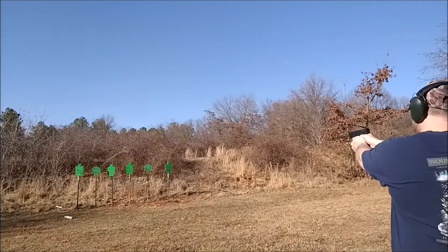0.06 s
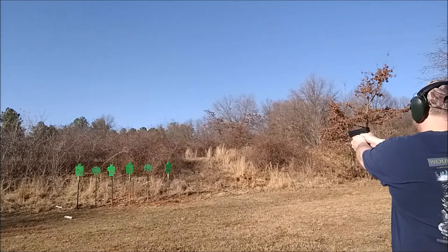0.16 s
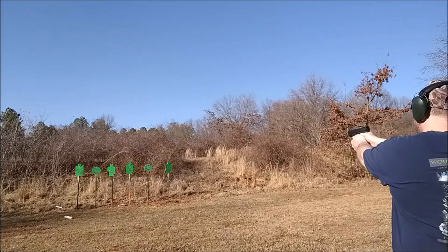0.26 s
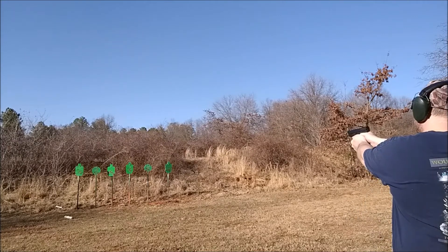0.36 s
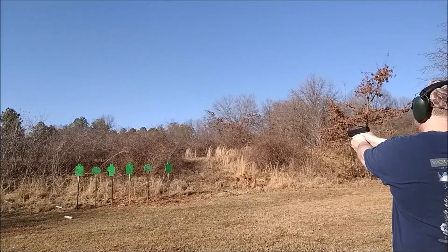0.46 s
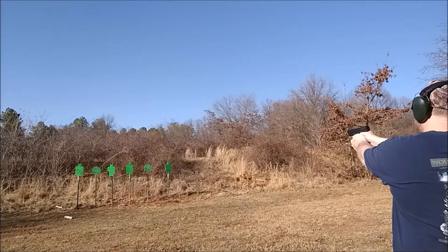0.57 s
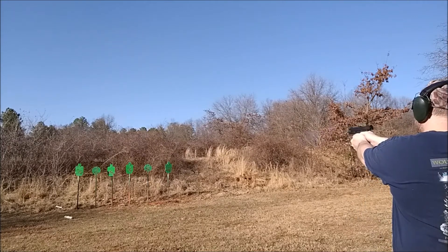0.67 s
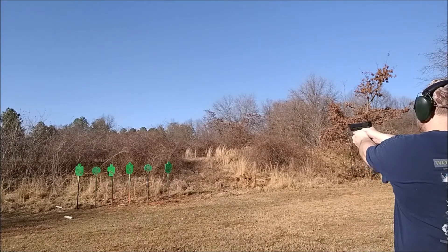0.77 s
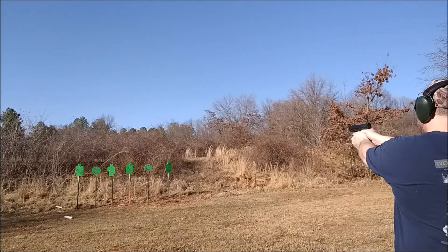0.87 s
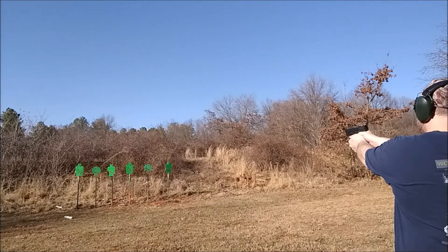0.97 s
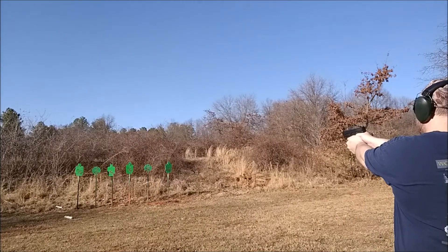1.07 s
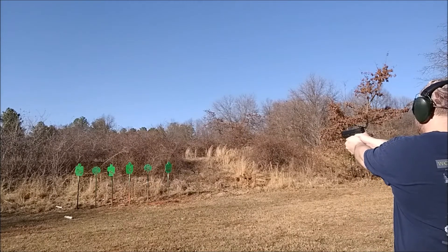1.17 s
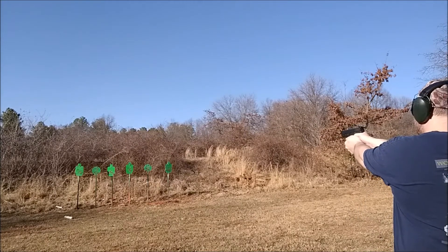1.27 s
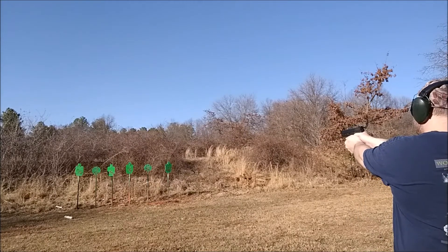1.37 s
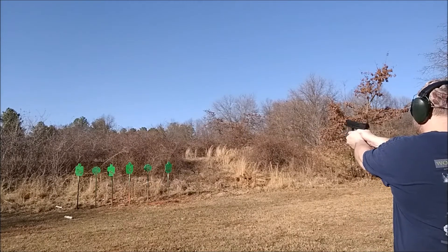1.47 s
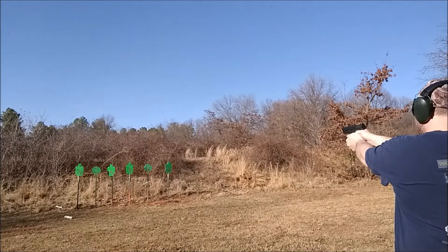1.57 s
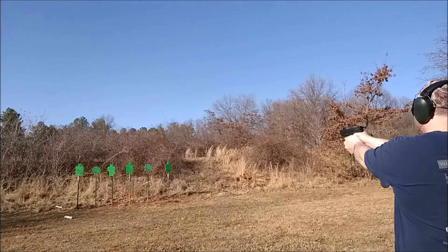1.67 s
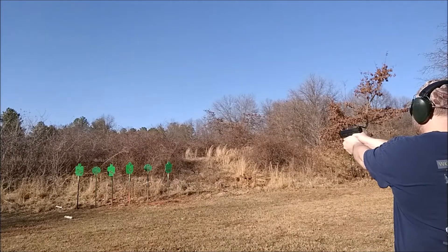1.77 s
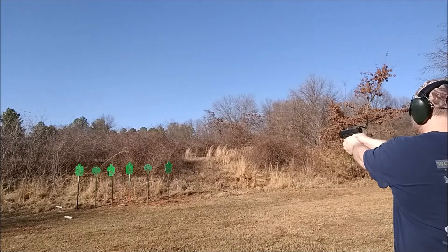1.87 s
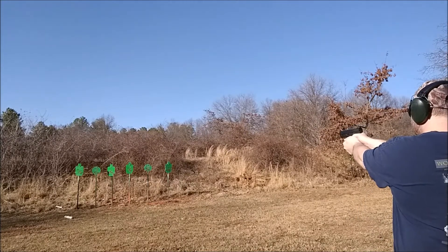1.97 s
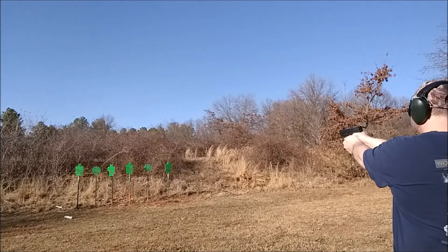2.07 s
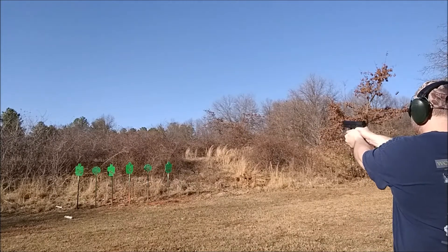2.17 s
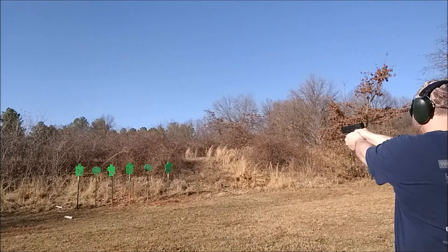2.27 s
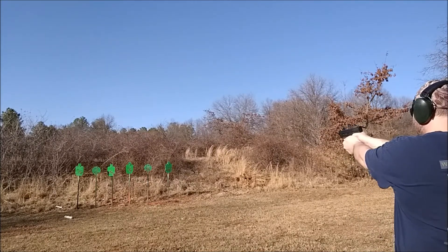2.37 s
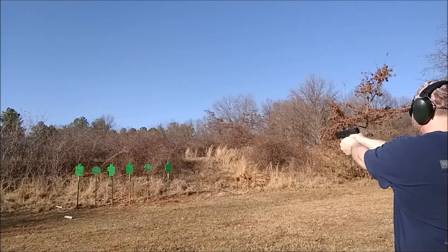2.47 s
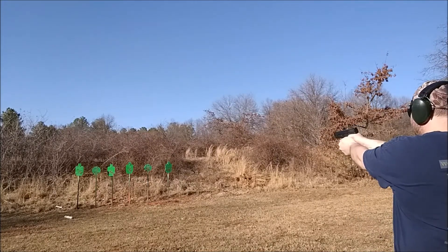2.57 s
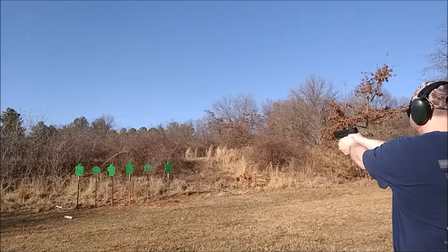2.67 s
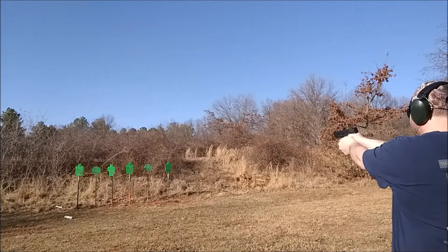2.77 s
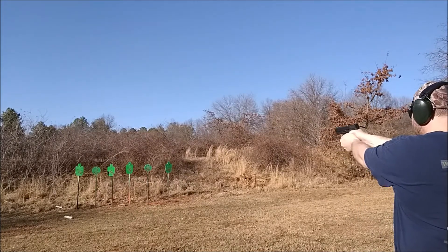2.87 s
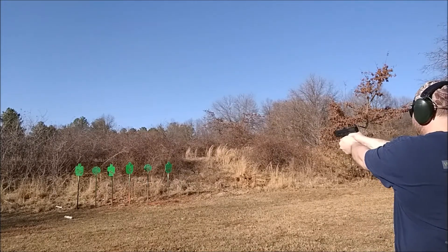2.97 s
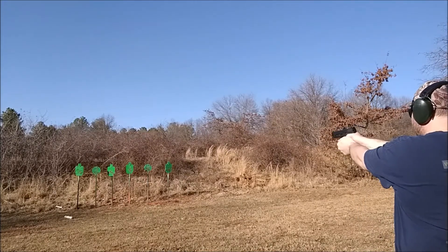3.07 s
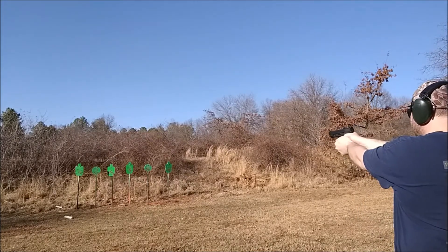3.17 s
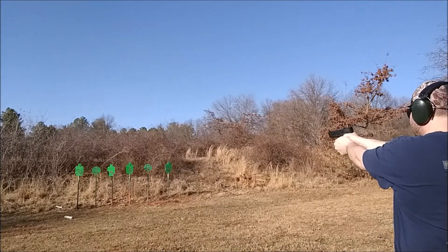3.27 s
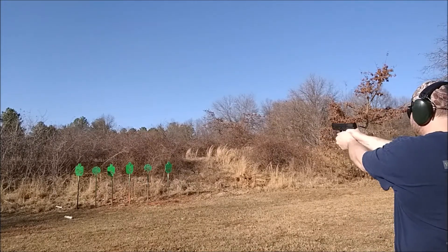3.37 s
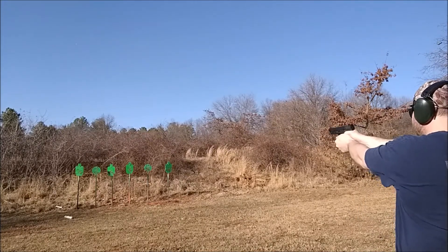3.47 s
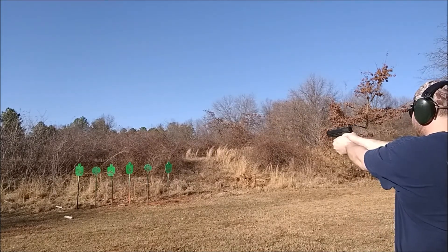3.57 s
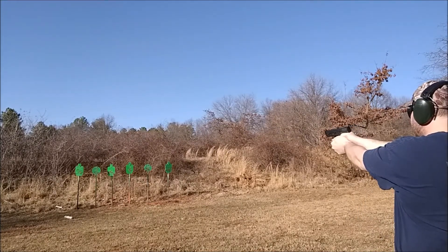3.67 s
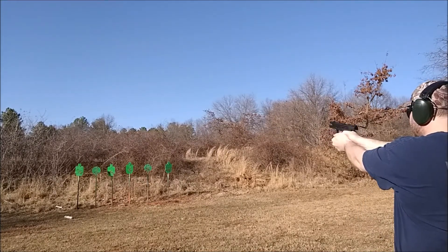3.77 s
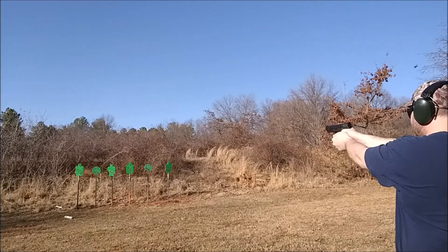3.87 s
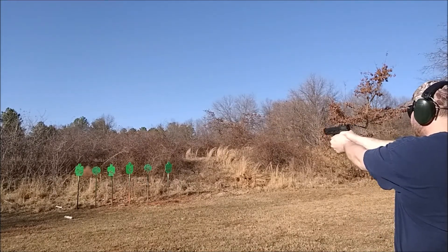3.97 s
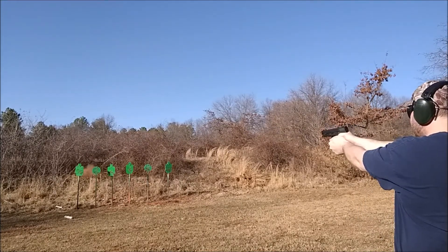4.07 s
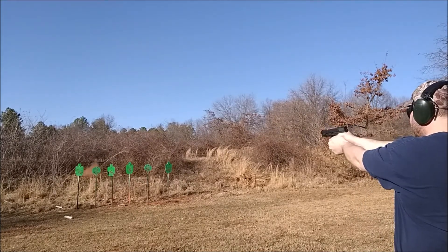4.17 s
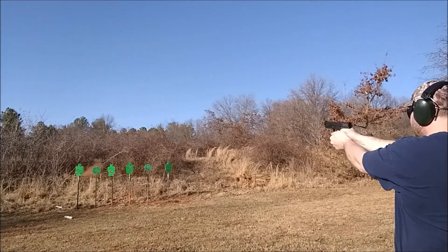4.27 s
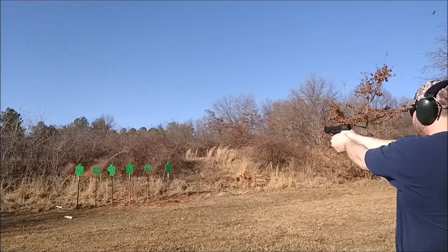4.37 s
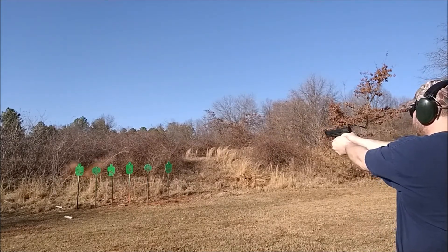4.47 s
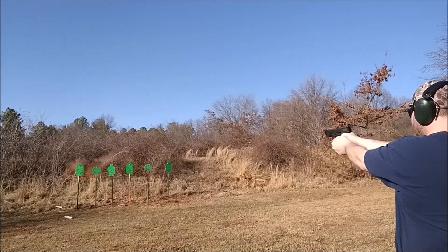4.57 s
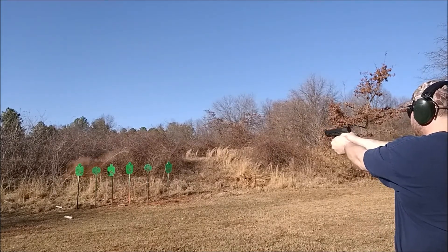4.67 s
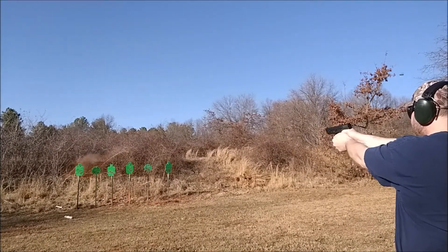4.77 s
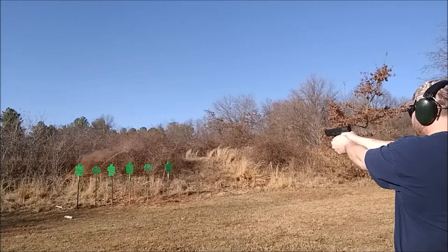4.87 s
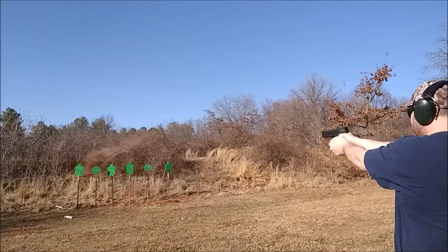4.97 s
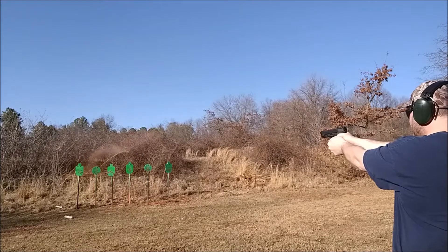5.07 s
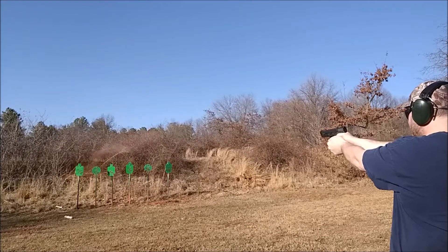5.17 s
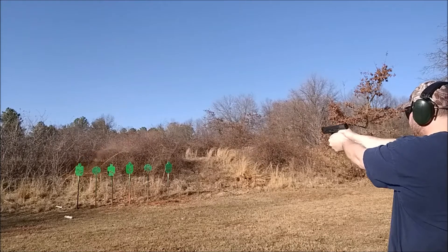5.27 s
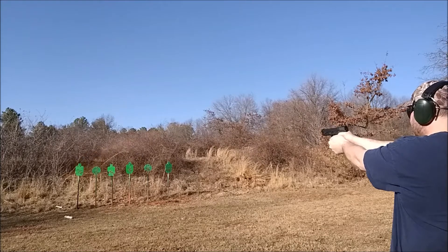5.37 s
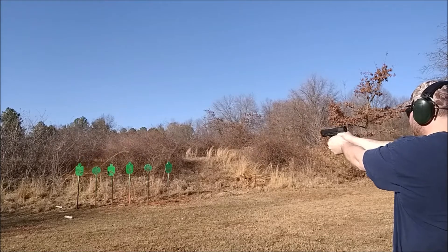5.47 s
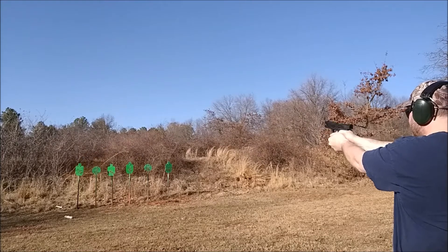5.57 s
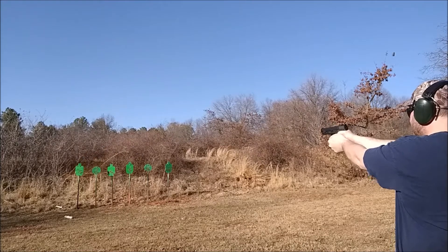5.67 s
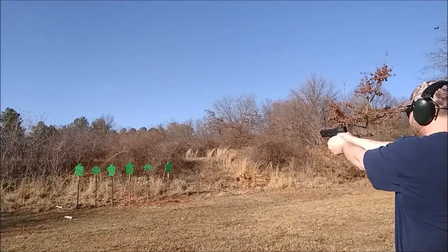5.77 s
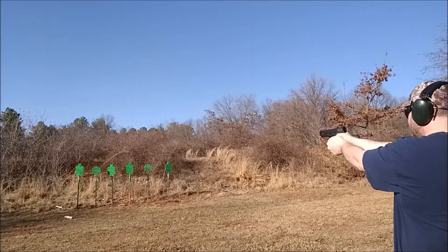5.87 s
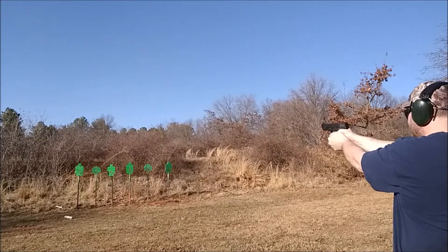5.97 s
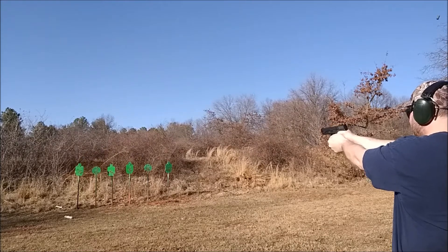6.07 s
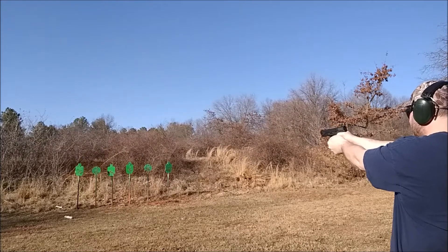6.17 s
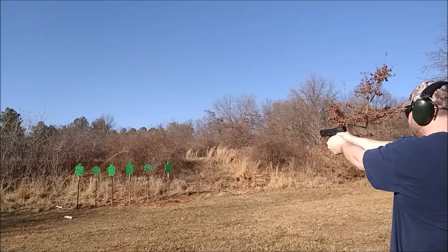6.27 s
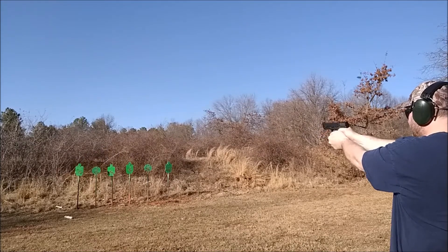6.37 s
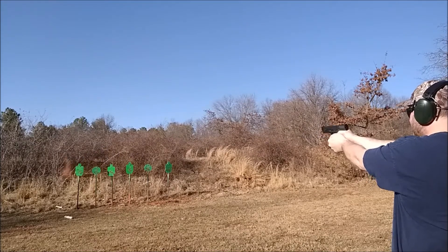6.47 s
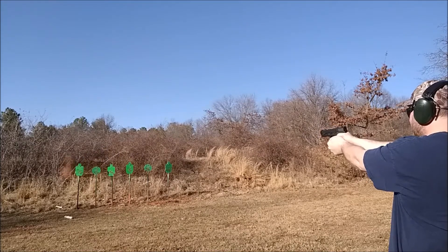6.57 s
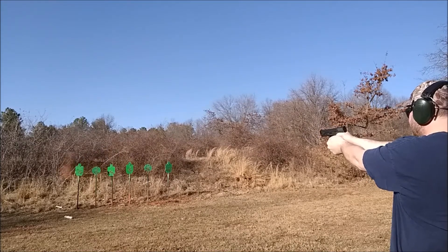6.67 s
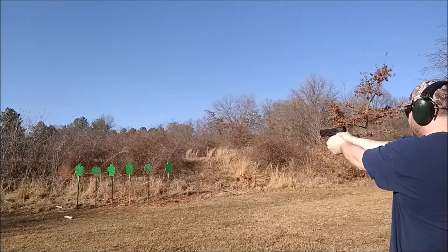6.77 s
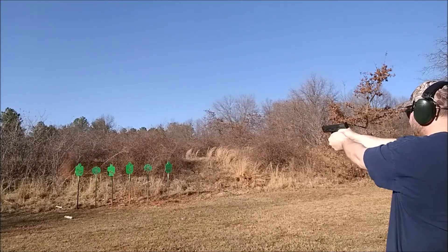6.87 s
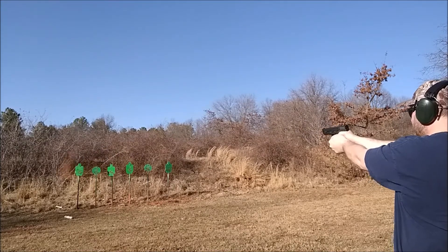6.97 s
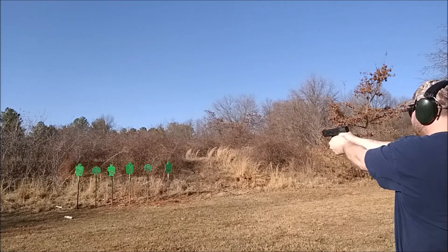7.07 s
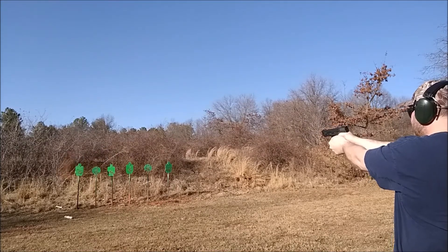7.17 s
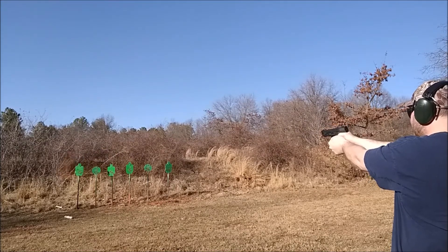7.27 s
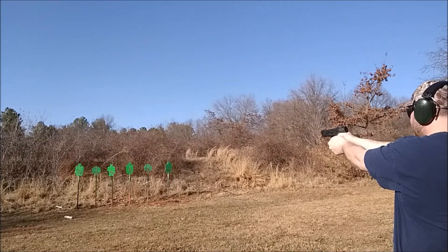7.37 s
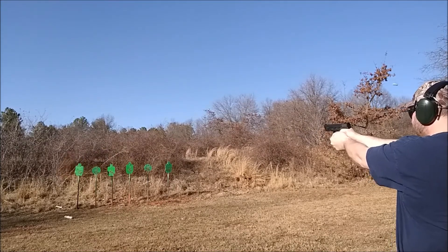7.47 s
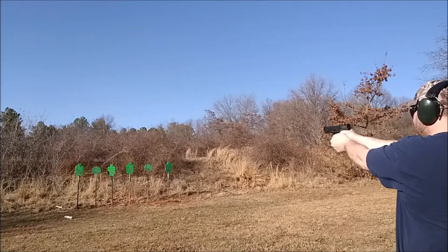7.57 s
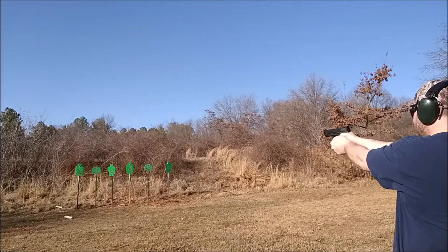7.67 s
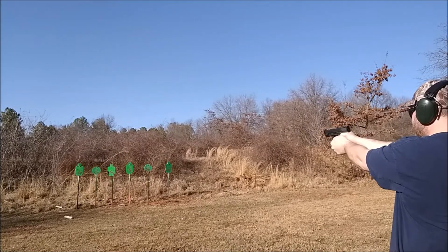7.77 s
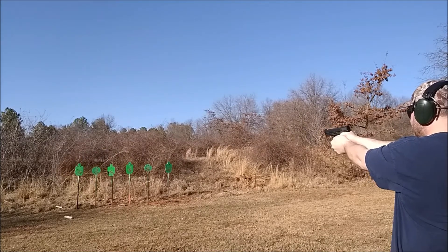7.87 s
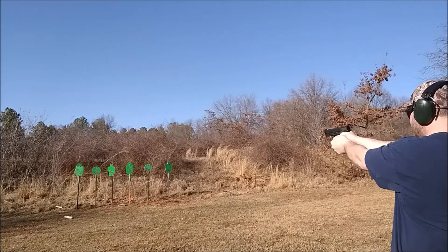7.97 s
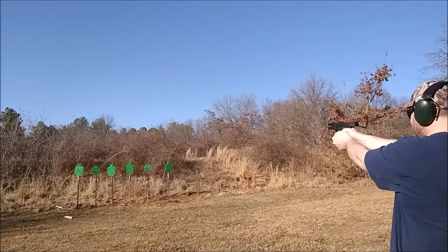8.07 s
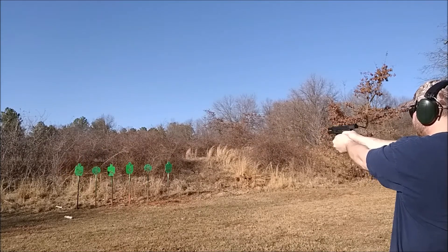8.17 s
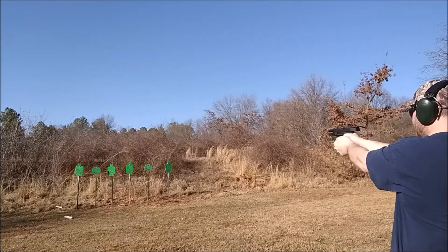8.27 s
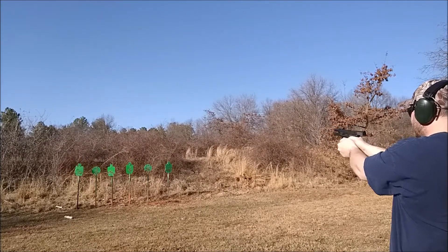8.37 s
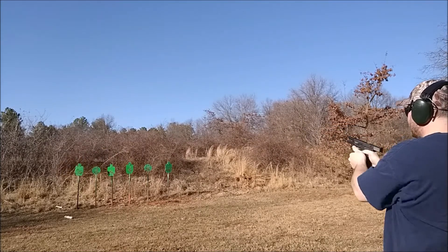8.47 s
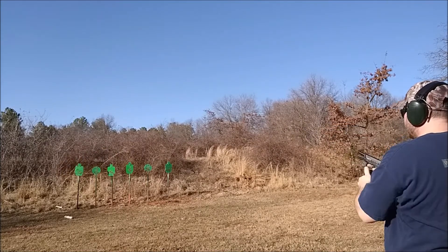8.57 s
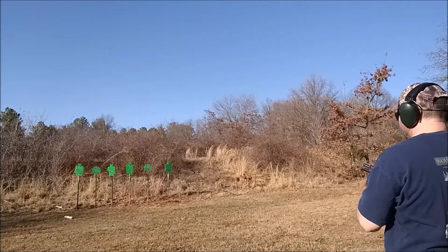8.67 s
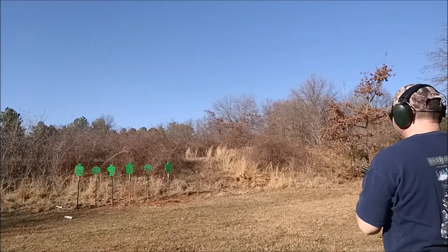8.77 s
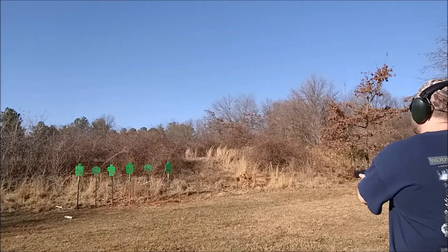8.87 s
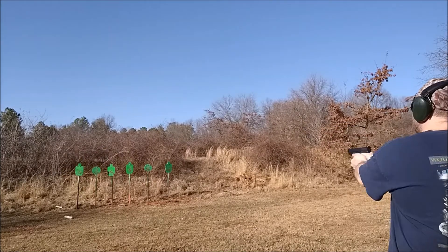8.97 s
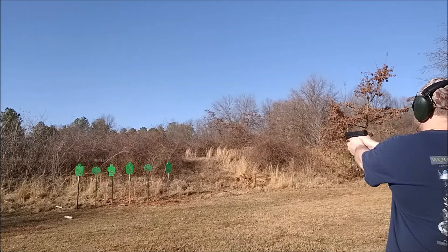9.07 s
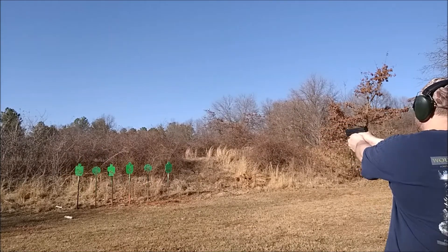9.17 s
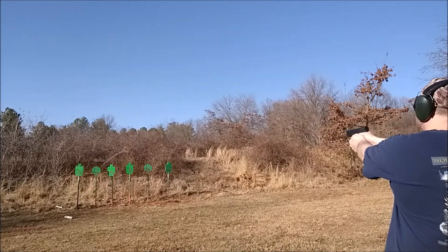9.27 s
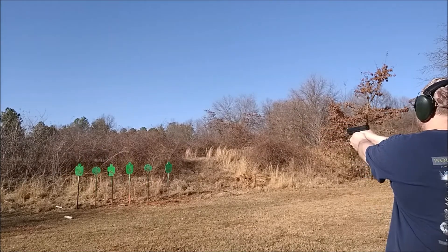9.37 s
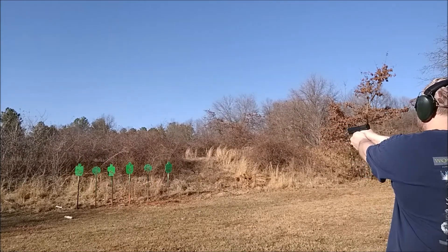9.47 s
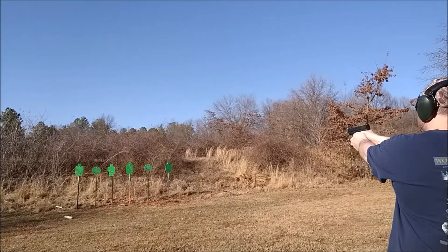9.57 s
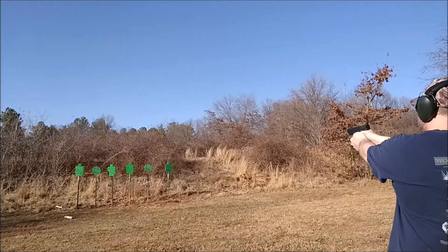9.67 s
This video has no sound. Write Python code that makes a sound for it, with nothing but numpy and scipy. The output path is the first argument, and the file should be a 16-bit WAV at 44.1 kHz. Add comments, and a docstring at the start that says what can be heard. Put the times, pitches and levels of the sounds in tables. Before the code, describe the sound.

Fifteen loud pistol shots crack across an open field, ten ringing steel plates about 50 milliseconds later, with rough echoes rolling off trees and light wind.

```python
"""Light wind and a faint air hiss come first; then a pistol fires fifteen times in a field edged by scrub.
Blasts are pressure pulses, hiss bursts and thumps; echoes from bank and trees are decaying bands of noise.
Hit steel plates ring on as decaying, beating sines; spent cases tick as short bright noise.
Wind is low noise with single puffs on the microphone ports. A stereo pocket recorder close by overloads
at each blast: its gain falls, jumps briefly twice, up or down, and recovers."""
import sys
import numpy as np
from scipy import signal
from scipy.fft import rfft, irfft
from scipy.io import wavfile

SR = 44100
rng = np.random.default_rng(int(sys.argv[2]) if len(sys.argv) > 2 else 0)


def inscribe(sig):
    """Save sig as 16-bit PCM at rate SR to the path in sys.argv[1].

    A 1-D sig is mono; a 2-D sig holds one channel per row.
    Samples are clipped to [-1, 1] before scaling.
    """
    pcm = np.round(np.clip(np.atleast_2d(sig).T, -1, 1) * 32767)
    wavfile.write(sys.argv[1], SR, pcm.astype(np.int16))


N = 429093
TIME = np.arange(N) / SR
# All source levels are ahead of the recorder's gain and saturation.

# steady air hiss, relative spectrum: (frequency [Hz], density [dB per Hz])
AIR = [(180, -23), (300, 3), (1550, -7.5), (1660, -6.5), (3140, -6.5), (3840, -8.5), (5190, -14),
       (15200, -2.5), (16500, -31)]
AIR_DB = -61
# wind strength: (time [s], level [dB])
WIND = [(0.0, -47.5), (0.46, -52), (1.35, -44.5), (2.0, -55.5), (2.6, -37.5), (3.0, -51), (3.28, -40),
        (3.5, -54), (3.98, -49.5), (4.79, -50.5), (5.07, -33), (5.94, -38), (6.07, -33), (7.07, -64.5),
        (7.34, -46), (7.45, -50.5), (8.67, -52.5), (9.73, -55.5)]
# single puffs on the ports: (time [s], level [dB], left minus right [dB])
BUFFETS = [(0.27, -42, -16), (0.59, -34, -12), (0.63, -35.5, -22), (8.768, -30, 16), (9.007, -39.5, 13),
           (9.055, -33.5, -16.5), (9.655, -42.5, -17)]

# pistol shots: (time [s], level [dB], first gain jump left [dB], right [dB],
#                second gain jump left [dB], right [dB], extra thump level [dB])
SHOTS = [(0.7226, -3.5, -13, 13, -25, 4.5, 4), (1.4886, -2, 5, -9, -6, 3.5, 2),
         (2.1943, 0, -4, -16, -8, 0, 1), (2.860, -2.5, 5.5, 3, 2, -3, -6),
         (3.3936, -2.5, -4, 7, -2.5, -3, 1), (3.8173, -2, 3, -10, 1, -1, 2),
         (4.2788, -2.5, 0, -15, 3, 0.5, 3), (4.7534, -2.5, 7.5, -16.5, 4.5, 3, -2.5),
         (5.2577, -1.5, 2, 8.5, 2.5, 1.5, -9), (5.5959, -1.5, -2, -18.5, -2, 2, 1),
         (5.9766, -2.5, 1, 3.5, 0, 4.5, -8), (6.374, -1.5, 0, -47, -29, -5, 3),
         (6.8606, -2.5, -6, -15, -9, -3, 2), (7.4623, -1.5, 1, 5.5, -12, 2.5, -2),
         (8.075, -2, -34, -6.5, -28, 1, 10.5)]
# blast and its distinct echoes, hiss ahead of its filters: (time after the shot [s], pulse level [dB],
#  pulse width [s], hiss level [dB], hiss t60 [s], hiss top [Hz])
ARRIVALS = [(.0015, 5, 0.00063, 14.5, 0.0099, 14000), (.0046, 9.5, 0.00015, 8, 0.0087, 14000),
            (.0165, 2, 0.00048, 8.5, 0.064, 12000), (.0487, 5, 0.00015, 0.5, 0.013, 12000),
            (.073, -3, .0002, -13.5, .03, 4000), (.2135, -18, 0.0002, -11, 0.032, 3000)]
# slow pressure swings of the blast: (time after the shot [s], level [dB], width [s])
THUMP = [(.001, 0.5, 0.0093), (0.017, -7, 0.0044)]
BLAST_VARIES_DB = 2.5   # random spread, drawn separately for each port

# echo tail, relative spectrum: (frequency [Hz], density [dB per Hz])
ECHO_COLOUR = [(71, -46), (120, -19), (316, -18), (529, -8.5), (677, -7.5), (751, -6), (1200, -3),
               (1610, -8), (5420, -5), (8530, -1), (10300, -51), (15200, -42), (16500, -53)]
# echo decay: (frequency [Hz], t60 [s])
ECHO_T60 = [(150, 0.8), (400, 0.95), (800, 1.74), (1300, 1.333), (2500, 0.95), (5000, 0.59), (9000, 0.35),
            (11000, 0.1), (14000, .25)]
# dips and swells of the scattered sound: (time after the shot [s], level [dB])
ECHO_SWELL = [(0, 7), (.03, -2), (.05, 6.5), (.12, -2)]
# clumps of reflectors, depth per unit of lumpiness: (frequency [Hz], depth [dB])
ECHO_LUMPS = [(200, 3.5), (900, 3), (2500, 1.5), (6000, 0.5)]
# second tail from the far woods: (frequency [Hz], level relative to the first tail [dB])
FAR_WOODS = [(300, -29), (700, -35), (1500, -88), (2600, -4), (4000, -40)]
FAR_WOODS_T60_S = 1.73
ECHO_DB, ECHO_STOPS_S = -6, 8.912
LAG, BASS_LAG = 15, 7   # right port delay [samples]; low scatter comes more from the front

# plate modes, in families that one hit point excites alike: (frequency [Hz], level [dB], t60 [s])
LARGE_MODES = [
    [(3130, 0, .9), (7525, -8, .35), (7920, -5, .4)],
    [(4745, 0, .5)],
    [(6095, 0, .45)],
    [(1405, 0, .25)],
    [(6165, -9, .3), (6918, -3, .33), (8110, -6, .3)],
    [(8690, 0, .3), (9410, -5, .25), (10150, -7, .22), (10720, -7, .22), (11820, -6, .22), (12520, -4, .23),
     (13370, -8, .17), (14050, -8, .17), (14900, -10, .14)],
]
SMALL_MODES = [
    [(6060, -6, .5), (6602, -1, .45), (8190, -8, .4), (8940, -5, .3)],
    [(12250, 0, .3), (11750, -3, .2), (13210, -3, .2), (13680, -2, .2), (13960, 0, .25), (14480, -2, .2)],
]
# strongest single tones of the plates: (frequency [Hz], t60 [s], right port delay [ms])
LARGE_TONES = [(2298, .78, .31), (3766, .64, .21), (3990, .55, .09), (4517, .58, .14), (11073, .4, .183)]
SMALL_TONES = [(1585, .27, .15), (3574, .58, .09), (3830, .6, .28), (10115, .45, .13)]
# hits: (time [s], detuning [parts per thousand], base split of the mode clusters [Hz], t60 factor [ratio],
#        left minus right of the single tones [dB], [level of each family [dB]],
#        [per single tone: (level [dB], partners), () if silent])
# partner: (offset from the tone [Hz], share of its strength [ratio], time after the hit when it opposes it [s])
LARGE_HITS = [ (0.78, 1.3, 7, 1.36, 2.5, [-31.5, -34.5, -33.5, -34.5, -25, -27], [(-14, (-6, 1, 0.062),
              (4.5, 0.82, 0.068)), (-13, (-7.5, 0.53, 0.013)), (-16.5, (-7.5, .4, 0.009)),
              (-17.5, (-3.3, 0.2, 0.084)), (-17.5, (-8, 0.91, 0.029))]),
              (2.915, -0.61, 15, 1, -1.5, [-35, -55, -42, -33, -18, -28], [(-6, (-12.5, 0.53, 0.026),
              (4.06, 0.52, 0.077)), (-30.5, (-4, 0, .12)), (-19.5, (-7, 1, -5)), (), (-50,)]),
              (3.449, 1.8, 11.7, 1.29, -4, [-35.5, -34, -57, -15.5, -14, -27.5], [(-13, (-11, 0.57, 0.036),
              (6.3, 0.47, 0.16)), (-36,), (), (-29, (-2, 0.9, 0.18)), (-62,)]),
              (5.651, -2.9, 9.5, 1, -3, [-35, -39, -63, -21, -12.5, -28], [(-12.5, (-5.5, 0.68, 0.068),
              (10.7, 0.19, 0.015)), (), (), (-21.5,), (-40,)]),
              (6.914, -2, 10, 1.02, -4, [-52, -40, -28, -15, -14, -34], [(-9, (-2, 0.87, -0.066),
              (3.64, 0.7, 0.04)), (-34,), (-17.5, (-3.5, 0.62, 0.016)), (), (-54, (-10, 0.17, .04))]),
              (7.517, -1.55, 7.1, 1.12, 2, [-35.5, -38, -27, -41, -51, -21.5], [(-31, (-8, 0.22, 0.18)),
              (-23, (-5.5, 0.86, 0.28)), (), (-19.5, (-3, 1, 0.026)), (-39, (-10.5, 0.85, 0.11))])]
SMALL_HITS = [(1.544, 0.19, 30, 0.86, -2.4, [-22.5, -36], [(-25,), (-23,), (), (-31, (-8, 0.5, .02))]),
              (2.247, 0.1, 16, 0.85, -1.5, [-21.5, -36], [(-13, (-8, .6, .06)), (-15, (-6, 0.41, 0.095)),
              (), (-31, (-7, .4, .02))]), (4.804, -0.1, 13, 0.94, -1.5, [-21, -38], [(-9, (-8, .6, .06)),
              (-14.5, (-2.5, 0.86, 0.033)), (), (-15, (-3, 1, 0.016))]),
              (8.13, 0.61, 14, 0.84, -1.5, [-24, -35], [(-19,), (), (-21.5, (-2, 0.67, .0)),
              (-31, (-4, .4, .02))])]
TONE_RISE_S = 0.0024   # time constant of the single tones' rise
# spent cases landing, noise ahead of its band-pass: (time [s], level [dB])
CASINGS = [(1.26, -74.5), (1.984, -62.5), (3.3662, -45), (7.382, -44), (8.5794, -47), (8.8852, -44)]

# recorder sensitivity: (time after the shot [s], gain [dB])
RECOVERY = [(0, -24), (.05, -13.5), (.15, -2), (.26, -1.5)]
# two brief gain jumps after each blast: (start after the shot [s], end after the shot [s], edge [s])
GAIN_JUMPS = [(.0055, .013, 0.00056), (.021, .041, 0.0038)]
CUTOFF_HZ = 17100


def from_db(db):
    """Decibels to amplitude gain."""
    return 10 ** (np.asarray(db) / 20)


def rms_one(x):
    """Scale to rms 1."""
    return x / np.sqrt(np.mean(x ** 2) + 1e-20)


def at_hz(points, hz):
    """Read a table on a log-frequency axis."""
    table = np.array(points)
    return np.interp(np.log(hz), np.log(table[:, 0]), table[:, 1])


def over_time(points, seconds):
    """Read a (time, value) table along straight lines."""
    return np.interp(seconds, *np.transpose(points))


def band(x, low_hz, high_hz):
    """Band-pass."""
    return signal.sosfilt(signal.butter(2, [low_hz, high_hz], "band", fs=SR, output="sos"), x)


def dull_top(x, shelf_db):
    """Noisy sound falls off a steep step in the top octave."""
    low = signal.sosfilt(signal.cheby2(8, 40, 10200, fs=SR, output="sos"), x)
    return low + from_db(shelf_db) * (x - low)


def drift(rate_hz, count):
    """Slow random wander of rms 1, one row for each of count."""
    r = np.exp(-2 * np.pi * rate_hz / SR)
    settle = 9000   # samples discarded while the filter settles
    noise = rng.standard_normal((count, N + settle))
    return rms_one(signal.lfilter([1], [1, -2 * r, r * r], noise)[:, settle:])


def add(out, sound, s):
    """Mix a sound in from time s on."""
    i = int(s * SR)
    out[..., i:i + sound.shape[-1]] += sound[..., :N - i]


def to_ports(x, lag=LAG):
    """One wave reaches the left port first, the right port lag samples later."""
    return np.array([x, np.roll(x, lag)])


def pan(left_minus_right_db):
    """Level offsets [dB] of the left and right ports, half the difference each way."""
    return left_minus_right_db / 2 * np.array([[1], [-1]])


def since_shot():
    """Index of the latest shot and the seconds since it (9 before the first)."""
    times = np.array(SHOTS)[:, 0]
    k = np.searchsorted(times, TIME, "right") - 1
    return k, np.where(k < 0, 9, TIME - times[k])


def air():
    """Steady hiss: noise shaped by a fixed spectrum, separate at each port."""
    colour = from_db(at_hz(AIR, np.arange(1, N // 2 + 2) * SR / N))
    hiss = irfft(rfft(rng.standard_normal((2, N))) * colour, N)
    return from_db(AIR_DB) * rms_one(dull_top(hiss, shelf_db=-28))


def wind():
    """Low noise, its own at each port, rising and falling together, and a few single puffs."""
    low_pass = signal.butter(3, 170, fs=SR, output="sos")
    low = signal.sosfilt(low_pass, band(rng.standard_normal((2, N)), 42, 250))
    flutter = from_db(0.5 * drift(4.9, count=1))
    out = rms_one(low * flutter) * from_db(over_time(WIND, TIME))
    u = np.arange(-400, 400) / SR / 0.0013
    puff = u * np.exp(-u * u / 2)
    for s, level_db, pan_db in BUFFETS:
        add(out, puff * from_db(level_db + pan(pan_db)), s - .003)
    return out


def blasts():
    """N-shaped pressure pulses, each wrapped in a burst of hiss, over a low thump."""
    t = np.arange(-90, 2200) / SR
    # returns are the pulses' echoes, which come back without their bass
    pulses, hisses, thumps, returns = np.zeros((4, 2, N))
    for s, shot_db, *_, low_db in SHOTS:
        for k, (after, pulse_db, width, hiss_db, t60, top_hz) in enumerate(ARRIVALS):
            start = s + after + t[0]
            pulse_gain, hiss_gain = from_db(shot_db + rng.normal(0, BLAST_VARIES_DB, (2, 2, 1)))
            early = k < 2
            u = t / width
            pulse = (-1) ** k * from_db(pulse_db) * u * np.exp(.5 - u * u / 2)
            ports = to_ports(pulse, LAG if early else BASS_LAG)
            add(pulses if early else returns, pulse_gain * ports, start)
            burst = from_db(hiss_db - 60 * np.maximum(t / t60, -t / 0.0021))   # rises, then decays
            hiss = burst * band(rng.standard_normal((2, len(t))), 580, top_hz)
            add(hisses, hiss_gain * hiss, start - .0005)
        for after, thump_db, width in THUMP:
            u = np.maximum(t, 0) / width
            gain = from_db(thump_db + low_db + rng.normal(0, BLAST_VARIES_DB, (2, 1)))
            add(thumps, gain * u * (2 - u) * np.exp(-u), s + after + t[0])
    direct = band(pulses, 76, 6000) + dull_top(hisses, shelf_db=-12) + band(thumps, 61, 340)
    return direct + band(returns, 496, 5000)


def bands(white_of_band, gain_of_band):
    """Third-octave noise bank; neighbouring bands take unrelated noise."""
    edges = 110 * 2 ** np.arange(0, 7.4, 1 / 3)
    total = 0
    for k, (low_hz, high_hz) in enumerate(zip(edges, edges[1:])):
        centre_hz = np.sqrt(low_hz * high_hz)
        total = total + gain_of_band(centre_hz) * band(white_of_band(k, centre_hz), low_hz, high_hz)
    return total


def echoes(same, alike_bass, alike):
    """Scatter from ground, bank and trees: mostly one repeating pattern, the treble dying before the middle."""
    _, since = since_shot()
    again = (since * SR).astype(int) % N   # restarts the pattern at each shot
    repeated, fresh = rng.standard_normal((2, 2, 3, N))
    white = np.sqrt(same) * repeated[..., again] + np.sqrt(1 - same) * fresh

    def spread(share, lag):
        """Mix a wave common to both ports with noise of their own, by power share."""
        return [np.sqrt(share) * to_ports(w[0], lag) + np.sqrt(1 - share) * w[1:] for w in white]

    bass, rest = spread(alike_bass, BASS_LAG), spread(alike, LAG)
    lumps = 0.25 * drift(47, count=1)[0][again] + 0.58 * drift(70, count=1)[0]
    clicks = np.zeros(N)
    clicks[[int(row[0] * SR) + 1 for row in SHOTS]] = from_db(2 * np.array(SHOTS)[:, 1])   # shot power

    def power(t60):
        """Echo power: every shot adds its own, and the sum decays."""
        return signal.lfilter([1], [1, -from_db(-120 / SR / t60)], clicks + 1e-18)

    far = power(FAR_WOODS_T60_S)

    def gain(hz):
        """Level of one band over time: both tails, colour and lumps."""
        both = power(at_hz(ECHO_T60, hz)) + far * from_db(2 * at_hz(FAR_WOODS, hz))
        return np.sqrt(both) * from_db(at_hz(ECHO_COLOUR, hz) + at_hz(ECHO_LUMPS, hz) * lumps)

    density = from_db(2 * at_hz(ECHO_COLOUR, np.arange(100, 17000)))
    scale = 1 / np.sqrt(np.trapezoid(density, dx=2 / SR))   # takes out the colour's overall level
    tail = scale * bands(lambda k, hz: (bass if hz < 750 else rest)[k % 2], gain)
    stop = np.clip((ECHO_STOPS_S - TIME) / 0.0066, 0, 1)   # the last tail breaks off
    return tail * stop * from_db(ECHO_DB + over_time(ECHO_SWELL, since))


def plates(families, hits):
    """Each mode is a cluster beating unevenly, unlike at the two ports; the hit point sets family strengths."""
    out = np.zeros((2, N))
    for s, detune, split_hz, length, _, family_db, _ in hits:
        for modes, strength_db in zip(families, family_db):
            chances = rng.random((len(modes), 4, 2, 1))
            for (hz, mode_db, t60), (start, phase, spread, weak) in zip(modes, chances):
                ring_s = t60 * length
                t = np.arange(int(.8 * SR * ring_s)) / SR
                turn = 2 * np.pi * t
                split = split_hz * (1 + spread[0])
                tone = turn * hz * (1 + detune / 1000) + 2 * np.pi * start
                lower = (0.67 + 0.23 * weak) * np.sin(tone - turn * split - 2 * np.pi * phase)
                upper = 1.2 * np.sin(tone + 1.55 * turn * split)
                decay = from_db(mode_db + strength_db - 60 * t / ring_s)
                add(out, (np.sin(tone) - lower - upper) * decay, s)
    return out * from_db(2 * drift(7, count=2))   # the plate swings on its post


def single_tones(tones, hits):
    """Strongest single tones of the plates, decaying sines, some beating with close partners."""
    out = np.zeros((2, N))
    for s, detune, _, length, pan_db, _, strokes in hits:
        for (hz, t60, late_ms), stroke in zip(tones, strokes):
            if not stroke:
                continue
            level_db, *partners = stroke
            ring_s = t60 * length
            t = np.arange(int(SR * ring_s)) / SR
            port_delay = np.array([[0], [late_ms / 1000]])
            tone = 2 * np.pi * hz * ((1 + detune / 1000) * t - port_delay)
            ring = np.sin(tone)
            for beat_hz, share, fade_s in partners:
                ring = ring - share * np.sin(tone + 2 * np.pi * beat_hz * (t - fade_s))
            level = from_db(level_db - 60 * t / ring_s + pan(pan_db))
            add(out, ring * level * (1 - np.exp(-t / TONE_RISE_S)), s)
    return out


def casings():
    """Faint bright ticks of brass in dry grass: short decaying bursts of band-passed noise."""
    out, t = np.zeros((2, N)), np.arange(700) / SR
    for s, level_db in CASINGS:
        noise = band(rng.standard_normal((2, len(t))), 4000, 9000)
        add(out, noise * from_db(level_db - 60 * t / 0.022), s)
    return out


def scene():
    """Air, wind, gun, field, plates and spent cases."""
    gun = blasts() + dull_top(echoes(same=0.78, alike_bass=0.64, alike=0.1), shelf_db=-1)
    large = plates(LARGE_MODES, LARGE_HITS) + single_tones(LARGE_TONES, LARGE_HITS)
    small = plates(SMALL_MODES, SMALL_HITS) + single_tones(SMALL_TONES, SMALL_HITS)
    return air() + wind() + gun + large + small + casings()


def record(dry):
    """Blasts deafen both ports; two brief gain jumps, up or down, differ by port; sensitivity then returns."""
    shot, since = since_shot()
    gain_db = np.tile(over_time(RECOVERY, since), (2, 1))
    for k, (start, end, edge) in enumerate(GAIN_JUMPS):
        jumping = np.clip(np.minimum(since - start, end - since) / edge + .5, 0, 1)
        first = 2 + 2 * k   # left and right columns of this jump
        gain_db += np.array(SHOTS)[shot, first:first + 2].T * jumping
    heard = .5 * np.tanh(dry * from_db(gain_db) / .5)   # soft overload
    return signal.sosfilt(signal.cheby2(12, 70, CUTOFF_HZ, fs=SR, output="sos"), heard)


dry = scene()
out = record(dry)
inscribe(out)
```